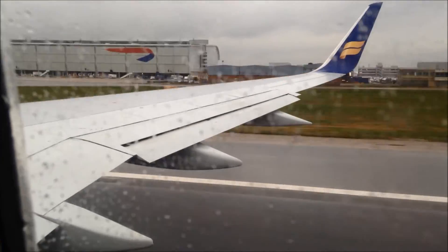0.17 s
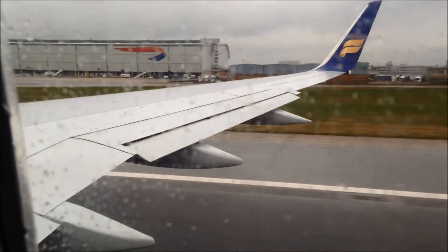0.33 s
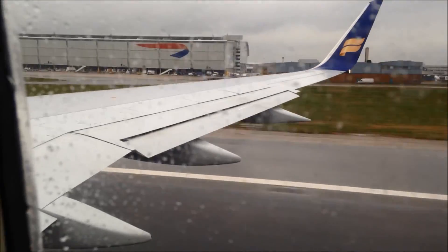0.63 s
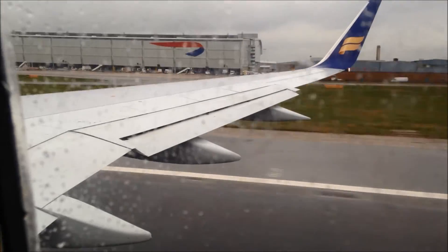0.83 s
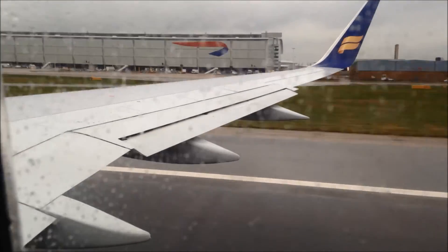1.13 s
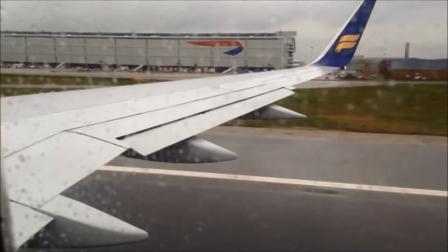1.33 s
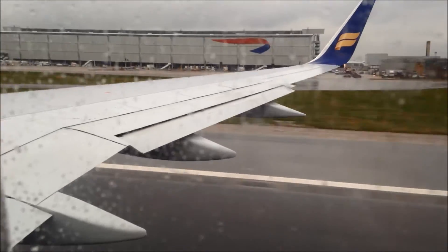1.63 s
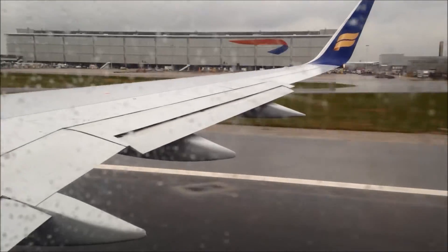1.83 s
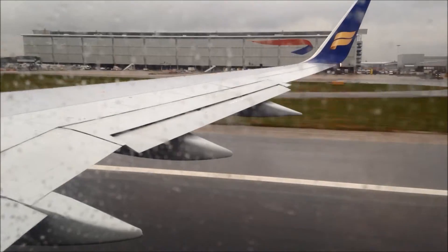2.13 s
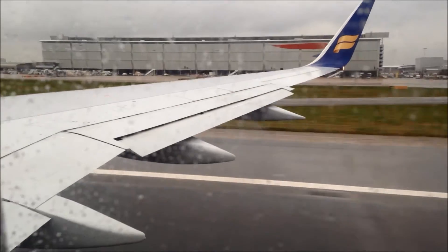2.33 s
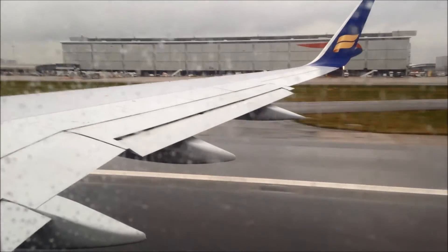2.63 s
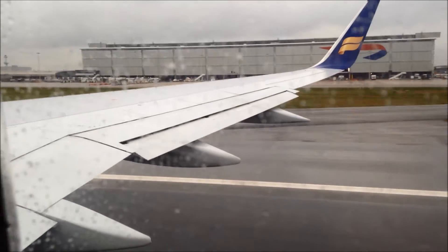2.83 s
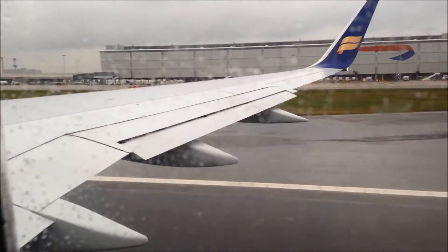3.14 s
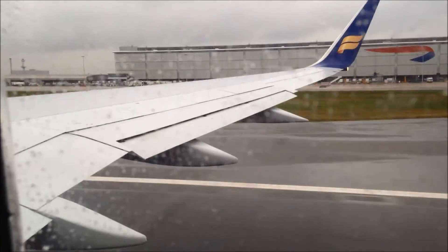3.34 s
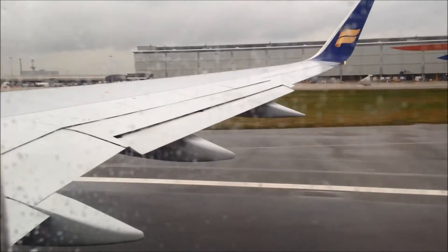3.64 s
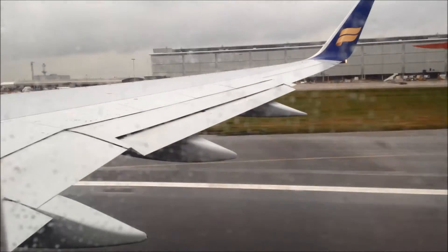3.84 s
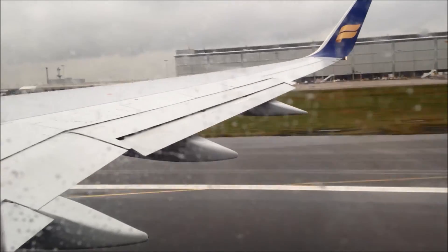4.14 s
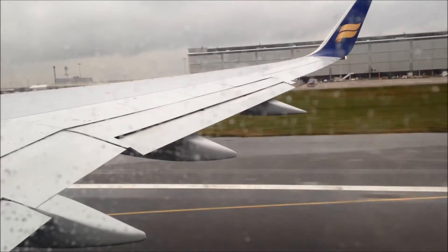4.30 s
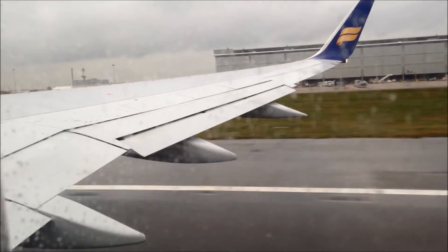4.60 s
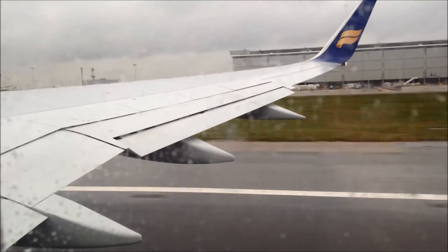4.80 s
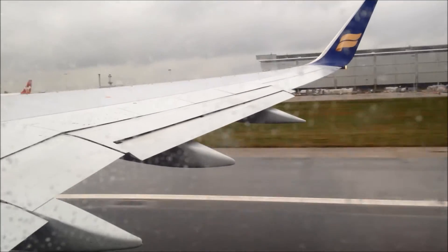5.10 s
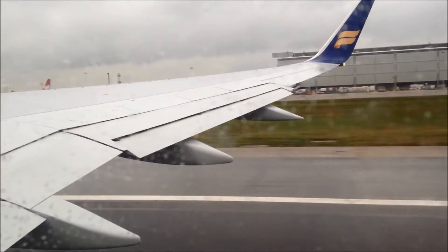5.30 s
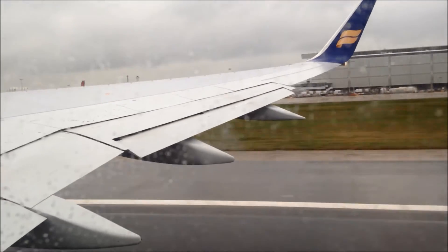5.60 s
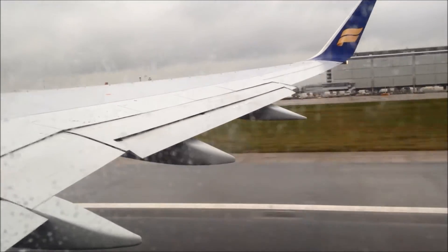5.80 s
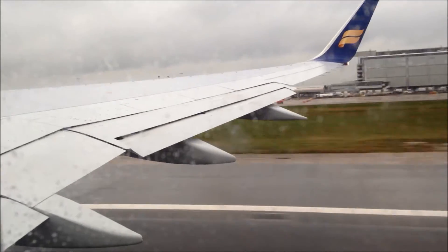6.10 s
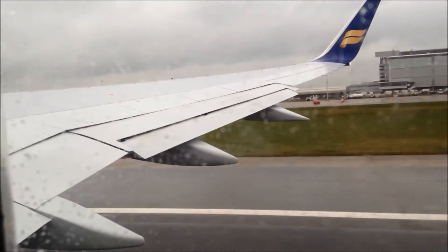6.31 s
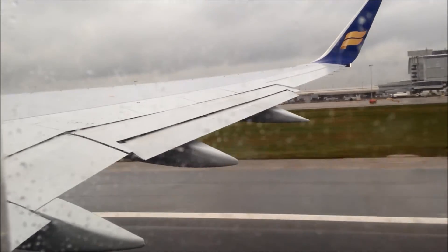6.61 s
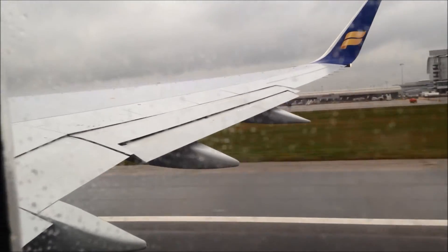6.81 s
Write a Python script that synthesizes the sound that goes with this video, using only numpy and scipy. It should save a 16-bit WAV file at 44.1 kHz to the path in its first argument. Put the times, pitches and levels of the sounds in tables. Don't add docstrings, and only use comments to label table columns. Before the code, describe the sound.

Inside an airliner on its take-off run, jet engines roar at full thrust as a loud, dense, boomy low rumble that churns and swells unevenly. Far quieter are rushing air, thin vent hiss, faint whine and brief puddle spray. A loose plastic panel ticks and buzzes, more often toward the end. The camera microphone is overloaded, dipping and clipping slightly on the biggest swings.

```python
import sys
import numpy as np
from scipy import signal
from scipy.fft import rfft, irfft, next_fast_len
from scipy.io import wavfile
from scipy.ndimage import uniform_filter1d, minimum_filter1d, map_coordinates

SR = 44100
rng = np.random.default_rng(int(sys.argv[2]) if len(sys.argv) > 2 else 0)


def store_pcm(level_fs):
    pcm = np.round(np.clip(level_fs, -1, 1) * 32767).astype(np.int16)
    wavfile.write(sys.argv[1], SR, np.atleast_2d(pcm).T)


def gain_from_db(level_db):
    decades = np.asarray(level_db, float) / 20
    return 10 ** decades


N = 306495

# time in seconds, roar level in dB.
THRUST = [(0, -10), (.3, -10), (.7, -10.5), (1, -9), (1.4, -9), (1.9, -10.5), (2.4, -10.5), (2.8, -10),
          (3.3, -10.5), (3.75, -11), (4.1, -10), (4.6, -9.5), (5.1, -10.5), (5.5, -9), (5.9, -9.5),
          (6.3, -9), (6.65, -9.5), (6.95, -9.5)]
# frequency in Hz, level in dB per Hz.
ROAR_COLOUR = [(12, -52.5), (20, -31), (48, -10), (117, -3), (155, 0), (253, -8), (307, -6), (363, -14.5),
               (412, -16.5), (480, -31), (560, -34.5), (730, -62.5), (1230, -120)]
# frequency in Hz, width in Hz, boost in dB.
CABIN_MODES = [(57.8, 22, 5), (98, 16, 2), (135.7, 20, -2.5), (155.3, 51, 4.5), (195.4, 7.5, 3),
               (264.4, 36, -1), (306.3, 16.3, 5.5), (413, 58, 1.5), (470, 13, -0.5)]
GROUP_DB = (-6, -3, -7, -15)
SWELL_DB, SWELL_RATE = 1.2, 12
# time in seconds, a note in that group in Hz,
# boost in dB.
SURGES = [(.13, 165, 4), (.27, 150, 7), (.58, 300, 5), (.77, 160, 0.5), (.87, 152, 0.5), (.95, 95, -2),
          (1.22, 125, 5.5), (2.2, 305, 8), (2.48, 125, 3.5), (2.55, 155, 9.5), (2.55, 305, 5.5),
          (2.83, 155, 8), (2.84, 305, 9.5), (3.04, 305, 5.5), (3.16, 160, 6.5), (3.6, 300, 15),
          (4.1, 310, 8), (4.33, 310, 5.5), (4.66, 100, 7.5), (4.97, 160, 4.5), (5.17, 145, 4.5),
          (5.94, 155, 2), (5.98, 60, 1), (6.19, 55, 7), (6.31, 305, 4.5), (6.48, 100, 3), (6.6, 155, 7.5),
          (6.7, 90, 13), (6.76, 150, 3.5), (6.92, 315, 4.5)]
SURGE_S = 0.025

# frequency in Hz, level in dB per Hz.
SKIN_COLOUR = [(250, -35.5), (420, -2.5), (478, -9.5), (575, -17.5), (642, -12.5), (697, -16.5), (981, -23),
               (1250, -23.5), (1890, -23), (2490, -29), (2700, -28), (3190, -36), (3800, -45.5),
               (4940, -68), (8360, -120)]
# frequency in Hz, width in Hz, boost in dB.
PANELS = [(621, 39, 1.5), (945, 150, -2), (1090, 70, 2), (1580, 81, -6), (1700, 70, -3), (1886, 69, -10),
          (2753, 170, -9), (3020, 120, -5)]
SKIN_DB, SKIN_FOLLOWS = -32, 0.42
# time in seconds, level in dB.
PUDDLES = [
    (.77, -62),
    (2.2, -55),
    (2.42, -57),
    (2.69, -52),
    (2.79, -49.5),
    (4.45, -57),
    (4.97, -53),
    (6.19, -54),
]
SPRAY_DB, SPLASH_S = -63, 0.042

# frequency in Hz, width in Hz, dB over the hiss, beading in dB.
SINGING = [(2485, 70, 0, 1.6), (3145, 35, -5, .6)]
WHINE_HZ = (1211.5, 1431)
# dB over the hiss, pitch wander in Hz.
WHINE_TONES = [(-2, 2.58), (-4.5, 3.6)]
WHINE_DB = -52.5

# frequency in Hz, level in dB per Hz.
VENT_COLOUR = [(1760, -24), (3000, -1), (4040, -4), (6800, -9), (9000, -7.5), (9700, -11.5), (11800, -13.5),
               (12600, -17), (15200, -20)]
# frequency in Hz, width in Hz, boost in dB.
VENT_DIPS = [(2740, 180, -8), (2960, 100, -4)]
# time in seconds, boost in dB.
GUSTS = [
    (3.85, 1),
    (4.17, 1.5),
    (4.61, 1),
    (4.96, 2.5),
    (5.62, 1.5),
    (6.62, 1),
]
VENT_DB, GUST_S = -47, .03

# frequency in Hz, width in Hz, level in dB.
TRIM_MODES = [(4120, 440, 4), (3810, 680, 1.5), (5300, 890, -5)]
# first knock in seconds, peak in dB, length in
# seconds (0 for a single tick).
RATTLES = [(.3007, -39, 0), (.3576, -41, .022), (0.415, -46, .022), (.6609, -37.5, .022), (.8305, -40, 0),
           (1.3675, -47, 0), (1.521, -38, .022), (1.708, -42, 0), (1.7514, -46, 0), (1.9, -45, .022),
           (2.2476, -45, 0), (2.538, -44, 0), (2.727, -46, .022), (3.089, -39, .022), (3.5683, -40, 0),
           (3.6336, -44, 0), (4.0607, -39, 0), (4.1629, -38, 0), (4.2195, -39, 0), (4.2762, -36, 0),
           (4.5221, -36, 0), (4.7571, -33, 0), (4.792, -36, .022), (4.968, -38, .022), (5.373, -34, 0),
           (5.4495, -32, 0), (5.8341, -34, .022), (5.904, -36, 0), (6.0621, -39, 0), (6.2477, -35, 0),
           (5.7977, -38, .022),
    (5.9374, -39, 0),
    (6, -41, .022),
    (6.1729, -44, 0),
    (6.352, -32, 0),
    (6.4986, -33, .044),
    (6.6169, -34, .066),
    (6.7246, -37, 0),
    (6.767, -35.5, .022),
    (6.8738, -41, 0),
]
RATTLE_S = .0214
FIRST_DB, LAST_DB = -4, -1

# time in seconds, peak in dB, time to fade 60 dB in seconds.
TAP = [
    (5.8152, -34, 0.06),
]
# frequency in Hz, level in dB.
CASE_COLOUR = [(1500, -24), (4000, 4), (6000, 4), (9000, 1), (11000, -6), (14000, -3), (16000, -9)]

# time in seconds, depth in dB.
DUCKS = [(.2, 1.5), (.8, 2.5), (.95, 3), (1.25, 2.5), (2.5, 1), (2.58, 3), (2.84, 1.5), (3.15, 2),
         (3.61, 3.5), (4.25, 0.5), (4.35, 2.5), (4.66, 1.5), (4.82, 0.5), (5.02, 1), (5.12, 1.5), (5.5, 2),
         (5.7, 0), (6.23, 3), (6.45, 1), (6.7, 2), (6.9, 1)]
DUCK_S, RECOVER_S, FIRST_DUCK_DB = 0.0091, 0.35, -0.5


def unit(x):
    return x / np.sqrt(np.mean(x ** 2) + 1e-20)


def since(s):
    return np.arange(N) / SR - s


def moments(events, half_s):
    return sum(height * np.exp(-(since(s) / half_s) ** 2) for s, height in events)


def along(points, hz):
    f, value = np.transpose(points)
    return np.interp(np.log(hz + 1), np.log(f + 1), value)


def thrust_curve():
    s, db = np.transpose(THRUST)
    return np.interp(np.arange(N) / SR, s, db)


def wobble(rate):
    knots = rng.standard_normal(int(N * rate / SR) + 4)
    return map_coordinates(knots, [np.arange(N) * rate / SR])


def filtered(x, response):
    m = next_fast_len(N + SR // 2)
    return irfft(rfft(x, m) * response(np.fft.rfftfreq(m, 1 / SR)), m)[..., :N]


def bumps(modes, hz):
    return sum(db / (1 + (2 * (hz - centre) / width) ** 2) for centre, width, db in modes)


def rush(colour_db, patchy_db, size=512, bins=8, frames=10):
    z = signal.stft(rng.standard_normal(N), nperseg=size)[2]
    patches = uniform_filter1d(rng.standard_normal(z.shape), size=bins, axis=0)
    patches = uniform_filter1d(patches, size=frames, axis=1)
    x = signal.istft(z * gain_from_db(patchy_db * unit(patches)), nperseg=size)[1][:N]
    return filtered(x, lambda hz: gain_from_db(colour_db(hz)))


def hump(centre_hz, width_hz):
    return unit(rush(lambda hz: -20 * np.log10(1 + ((hz - centre_hz) / width_hz) ** 2), patchy_db=3.0))


def steadied(x, seconds, share):
    size = int(seconds * SR)
    power = np.abs(uniform_filter1d(uniform_filter1d(x ** 2, size), size))
    return unit(x / (power + 1e-12) ** (share / 2))


def roar():
    def colour(hz):
        bass_cut = -10 * np.log10(1 + (44 / (hz + 12)) ** 10)
        return along(ROAR_COLOUR, hz) + bumps(CABIN_MODES, hz) + bass_cut

    noise = rush(colour, patchy_db=0.08)
    edges = (125, 240, 345)  # Hz, between the groups
    below = [filtered(noise, lambda hz: 1 / (1 + (hz / edge) ** 12)) for edge in edges]
    groups = np.diff([0 * noise, *below, noise], axis=0)
    swell_db = np.array([db + SWELL_DB * wobble(SWELL_RATE) for db in GROUP_DB])
    for s, hz, db in SURGES:
        swell_db[np.searchsorted(edges, hz)] += moments([(s, db)], SURGE_S)
    boom = sum(gain_from_db(db) * steadied(x, 0.066, share=0.32) for db, x in zip(swell_db, groups))
    return gain_from_db(thrust_curve()) * boom


def gain_control():
    def drop(t):
        return np.clip(t / DUCK_S, 0, 1) * np.exp(-np.abs(t) / RECOVER_S)

    ducked_db = sum(db * drop(since(s)) for s, db in DUCKS)
    return gain_from_db(-FIRST_DUCK_DB * drop(since(-0.1)) - ducked_db)


def skin():
    thrust_db = thrust_curve()
    flow_db = SKIN_DB + SKIN_FOLLOWS * (thrust_db - thrust_db.mean()) + 0.7 * wobble(16)
    streaks = unit(rush(lambda hz: along(SKIN_COLOUR, hz) + bumps(PANELS, hz),
                        patchy_db=2.0, size=2048, bins=6, frames=3))
    spray = gain_from_db(SPRAY_DB) + moments([(s, gain_from_db(db)) for s, db in PUDDLES], SPLASH_S)
    return gain_from_db(flow_db) * streaks + spray * hump(2800, 160)


def whine():
    sound = np.zeros(N)
    for hz, width, db, bead_db in SINGING:
        sound += gain_from_db(db + bead_db * wobble(30)) * hump(hz, width)
    for hz, (db, wander) in zip(WHINE_HZ, WHINE_TONES):
        phase = 2 * np.pi * np.cumsum(hz + wander * wobble(8.7)) / SR
        sound += gain_from_db(db + 2.0 * wobble(5.5)) * np.sin(phase)
    return gain_from_db(WHINE_DB) * sound


def vent():
    noise = unit(rush(lambda hz: along(VENT_COLOUR, hz) + bumps(VENT_DIPS, hz), patchy_db=0.7))
    return gain_from_db(VENT_DB + moments(GUSTS, GUST_S) + 0.31 * wobble(23)) * noise


def trim():
    blows = np.zeros(N)
    luck = rng.random((1500, 2))
    at = (luck[:, 0] ** .8 * N).astype(int)
    blows[at] = gain_from_db(-24.5 - 2.5 * np.log(luck[:, 1] + .02) + 2.5 * wobble(7)[at])
    for s, db, length in RATTLES:
        knocks = np.arange(s, s + length + RATTLE_S / 2, RATTLE_S)
        knock_db = db + 27.5 + rng.normal(0, 1.5, len(knocks))
        if len(knocks) > 2:
            knock_db += np.interp(knocks, [s, s + length / 2, s + length], [FIRST_DB, 0, LAST_DB])
        blows[(knocks * SR).astype(int) + 20] = gain_from_db(knock_db)

    def panel(f):
        ring = 0
        for k, (centre, width, db) in enumerate(TRIM_MODES):
            damping = 1j * f * width
            ring = ring + (-1) ** k * gain_from_db(db) * damping / (centre ** 2 - f * f + damping)
        plate = 1j * f * 2500 / (4300 ** 2 - f * f + 1j * f * 2500)
        return ring * plate

    return filtered(blows, panel)


def tap():
    t = np.arange(N) / SR

    def fade(s, t60):
        return (t >= s) * gain_from_db(-60 * np.abs(t - s) / t60)

    burst = unit(filtered(rng.standard_normal(N), lambda hz: gain_from_db(along(CASE_COLOUR, hz))))
    ping = np.sin(2 * np.pi * 12900 * t)
    sound = np.zeros(N)
    for s, db, t60 in TAP:
        sound += gain_from_db(db - 3) * fade(s + .0003, 0.007) * ping
        sound += gain_from_db(db - 6) * fade(s, t60) * burst
    return sound


def scene():
    return (roar() + skin() + whine() + vent() + trim() + tap())[None]


def roll_off(x):
    return signal.sosfilt(signal.butter(12, 15300, fs=SR, output="sos"), x)


def record(dry):
    dry = gain_control() * dry
    hold = SR // 60
    needed = np.minimum(1, .975 / (np.abs(dry) + 1e-9)) ** .8
    gain = minimum_filter1d(needed, hold)
    gain = uniform_filter1d(uniform_filter1d(gain, hold // 2), hold // 2)
    mix = np.clip(gain * dry, -1, 1)
    return roll_off(mix)


dry = scene()
out = record(dry)
store_pcm(out)
```